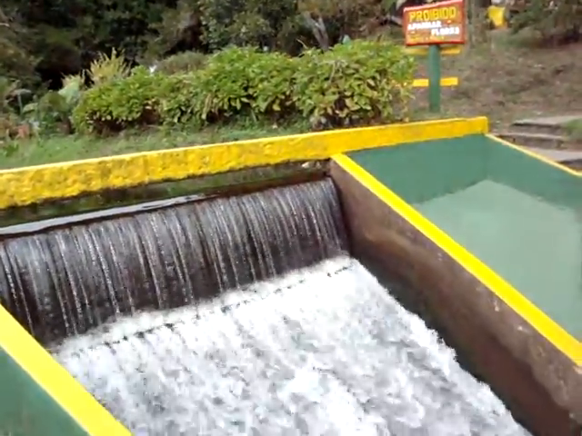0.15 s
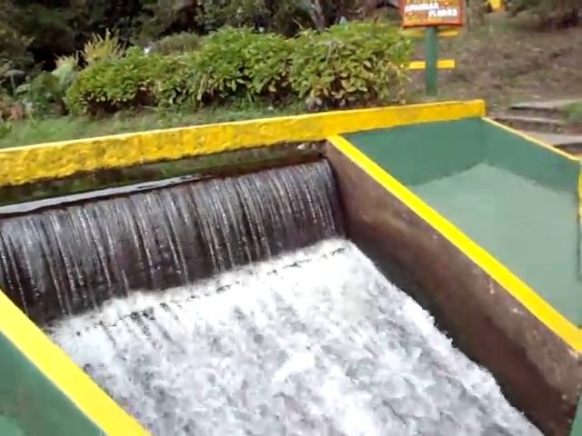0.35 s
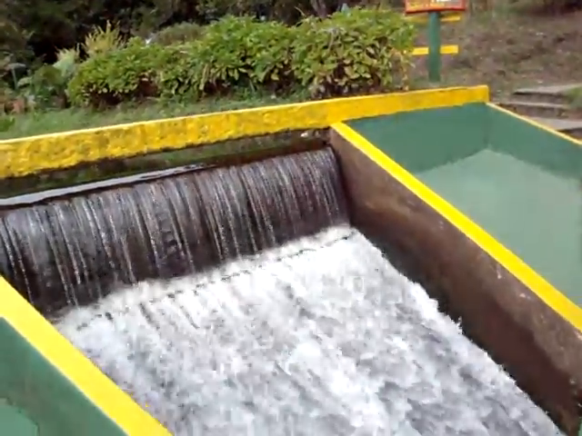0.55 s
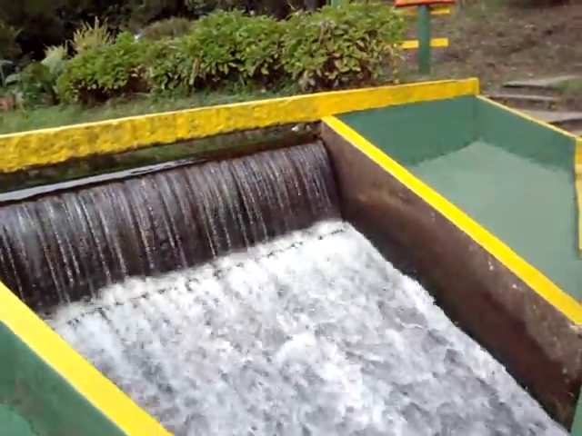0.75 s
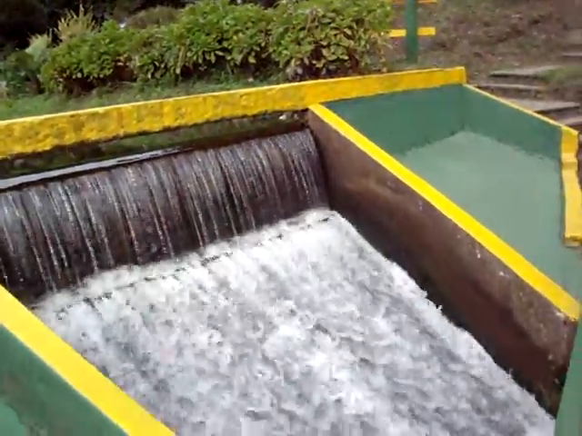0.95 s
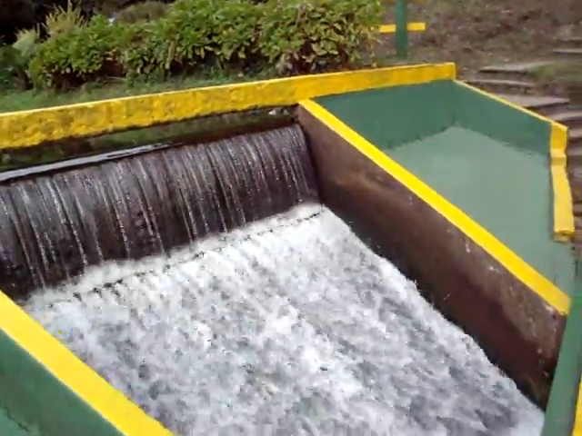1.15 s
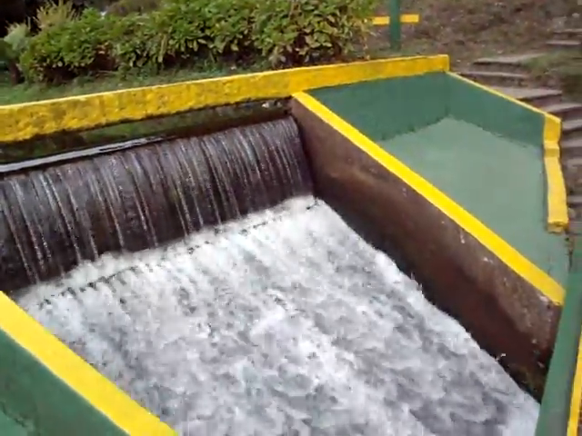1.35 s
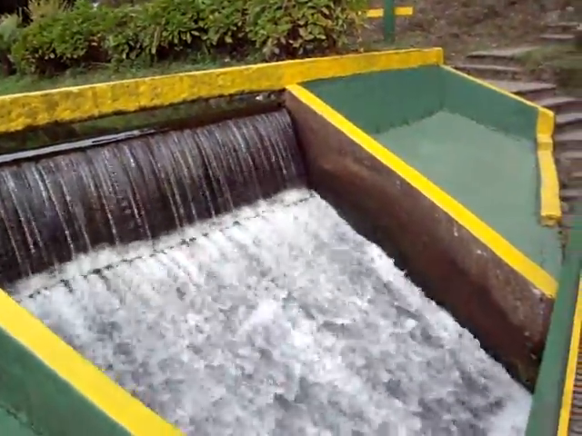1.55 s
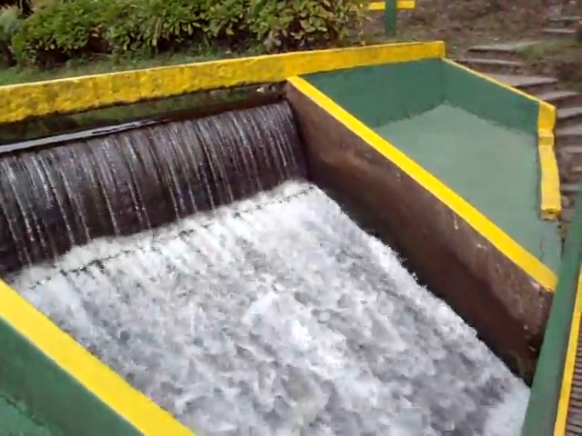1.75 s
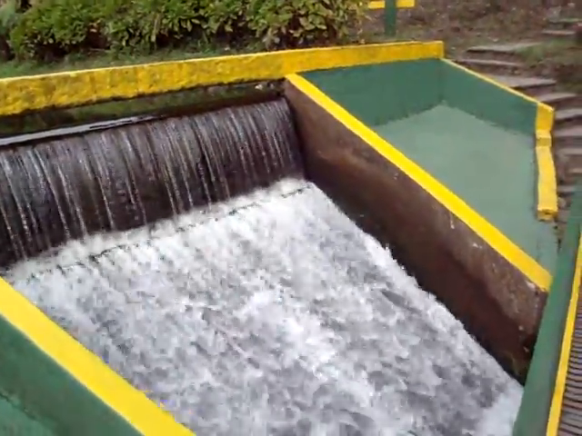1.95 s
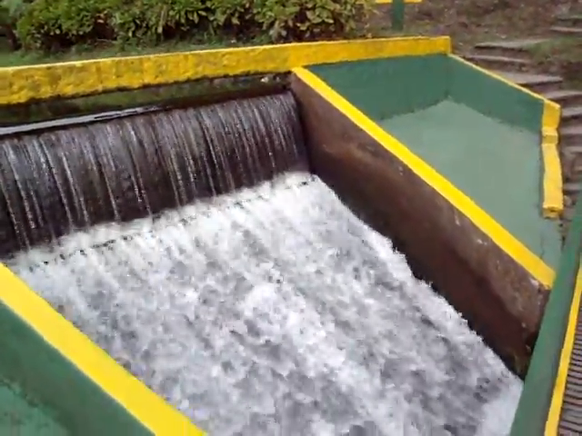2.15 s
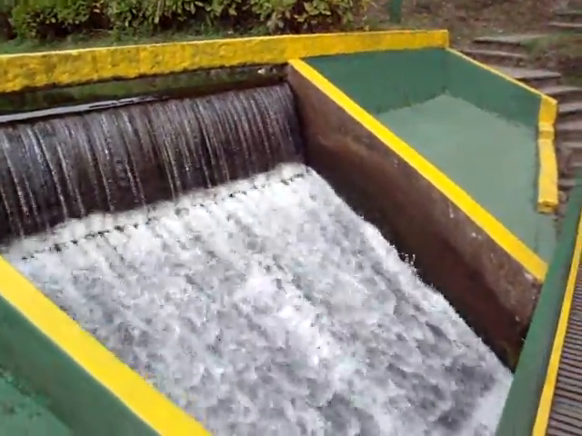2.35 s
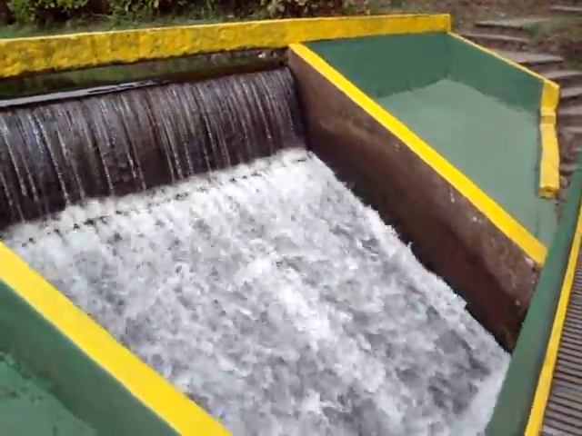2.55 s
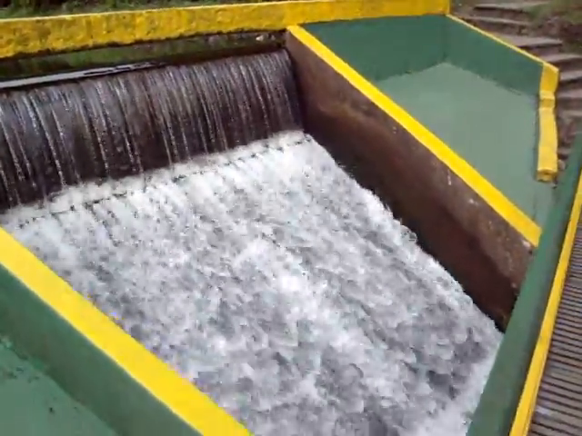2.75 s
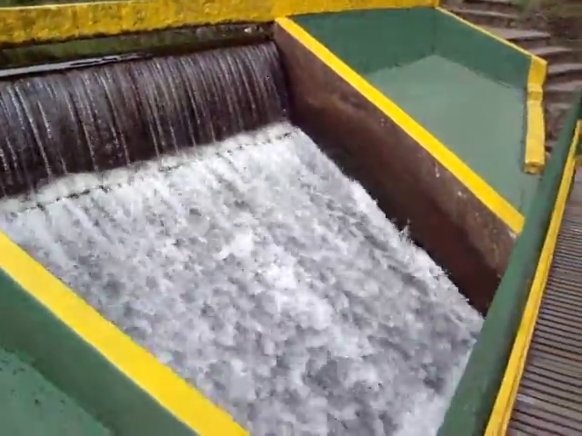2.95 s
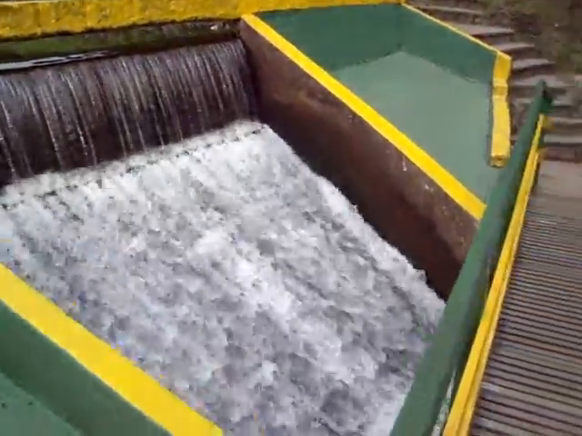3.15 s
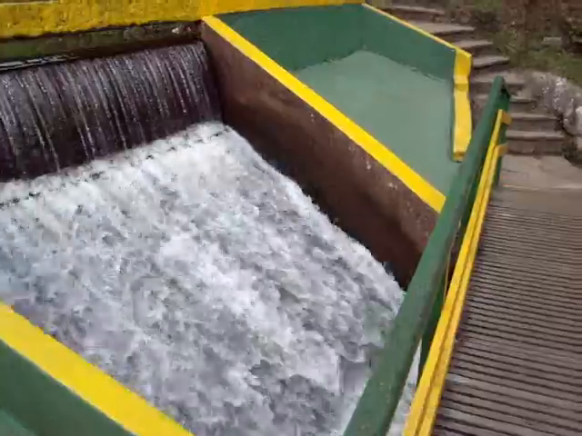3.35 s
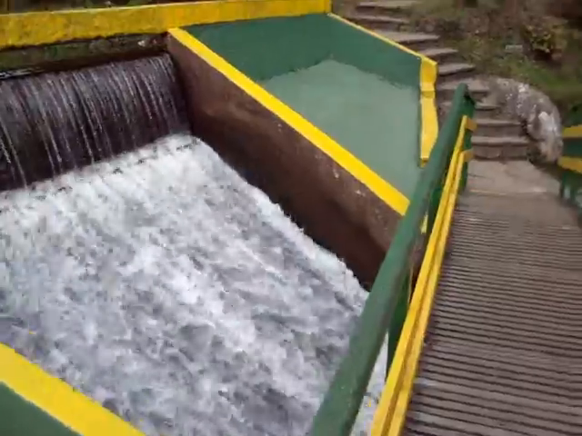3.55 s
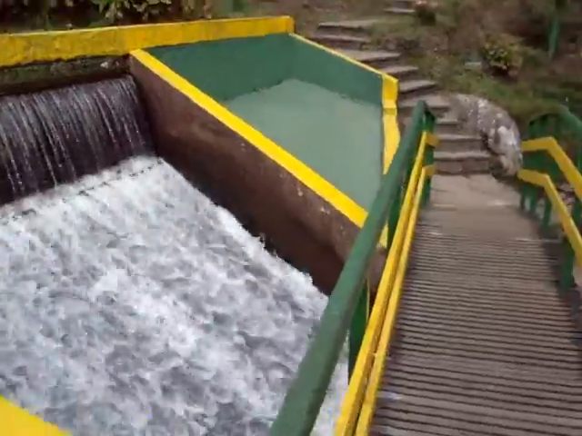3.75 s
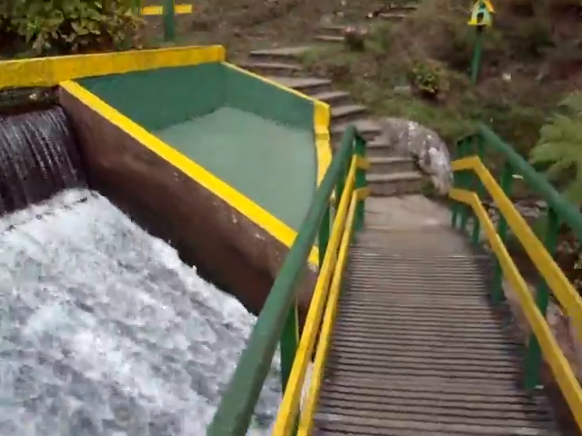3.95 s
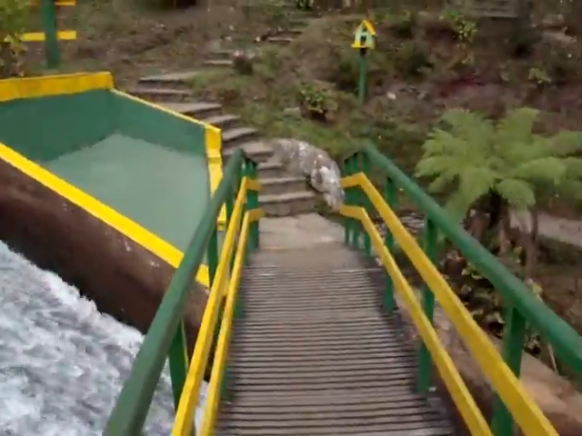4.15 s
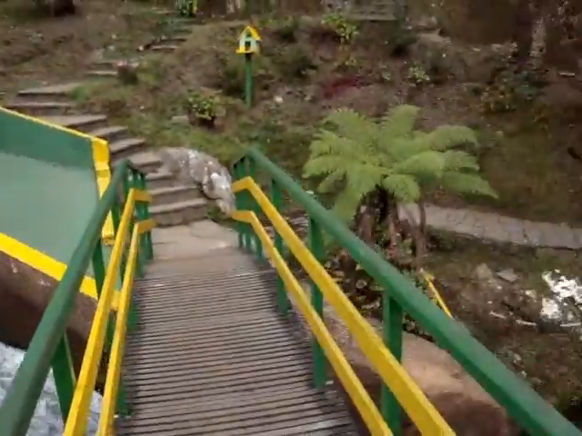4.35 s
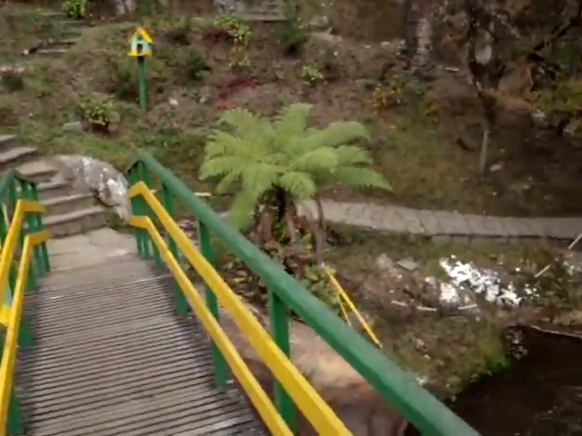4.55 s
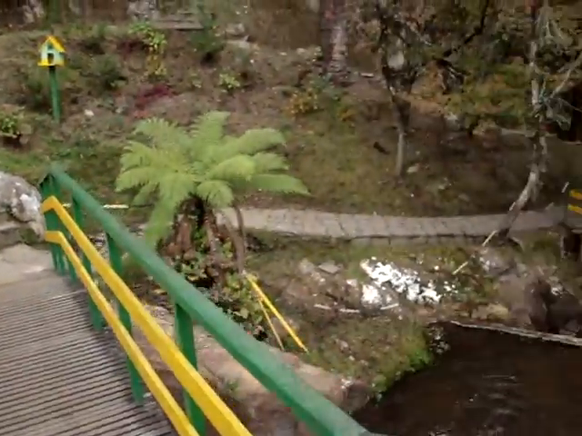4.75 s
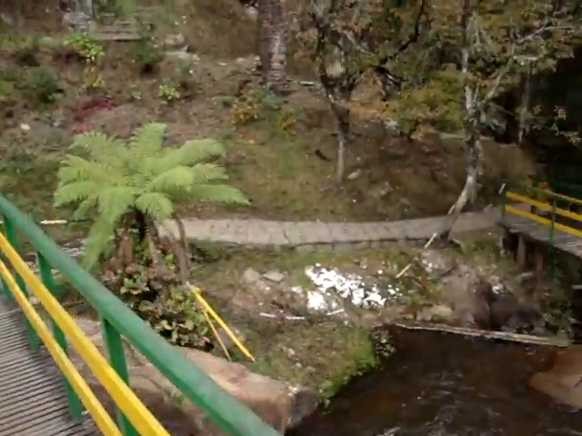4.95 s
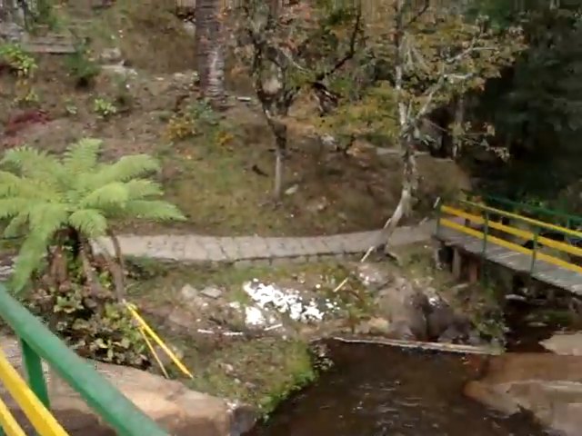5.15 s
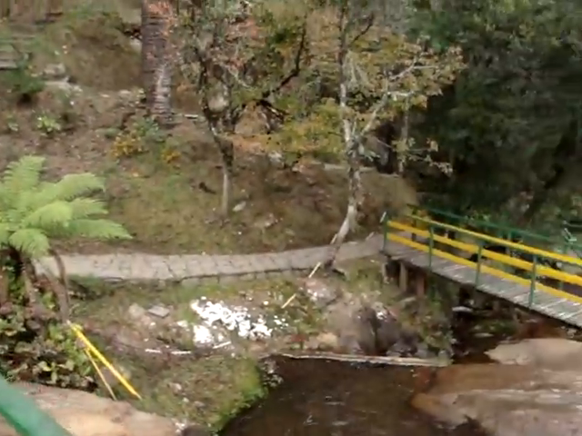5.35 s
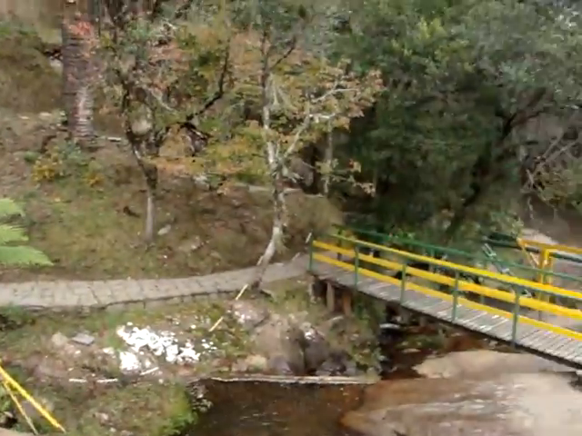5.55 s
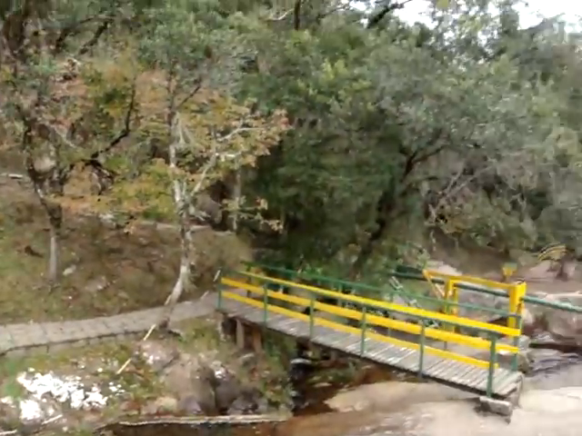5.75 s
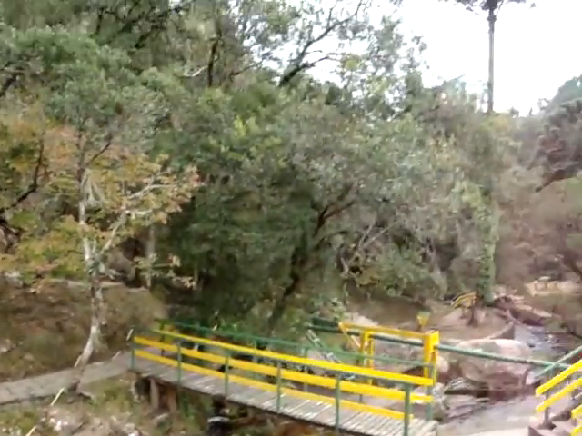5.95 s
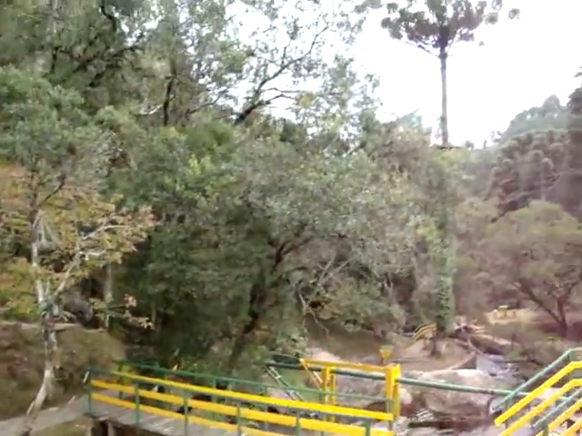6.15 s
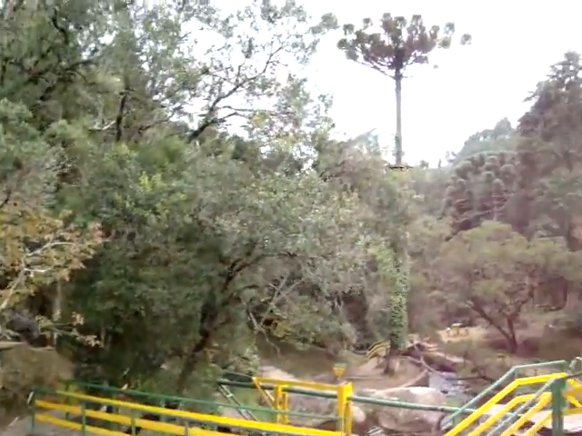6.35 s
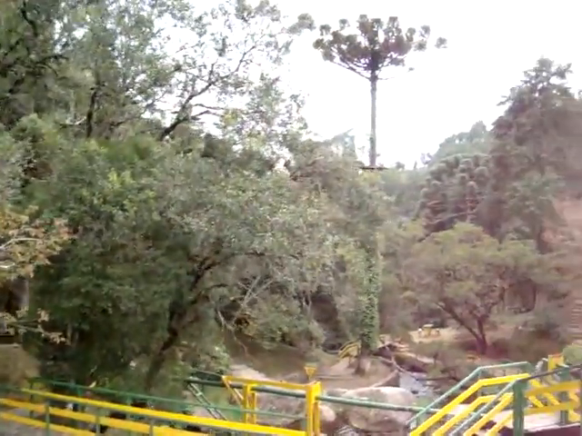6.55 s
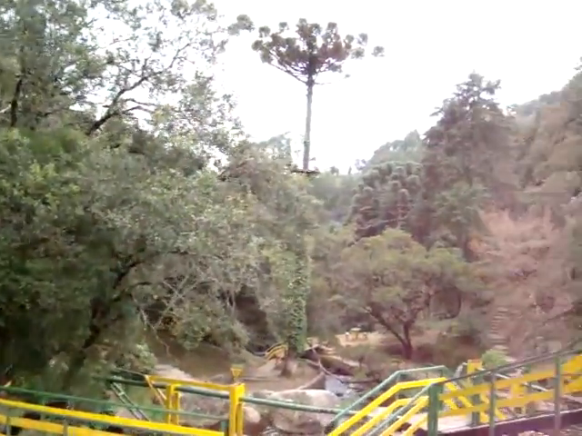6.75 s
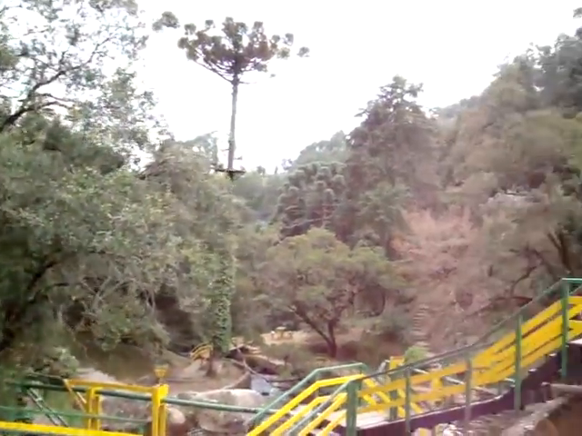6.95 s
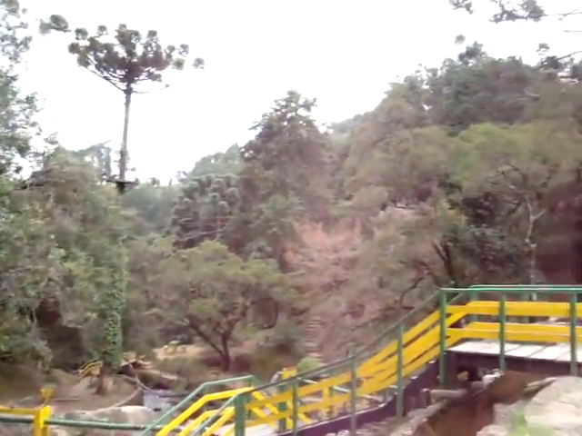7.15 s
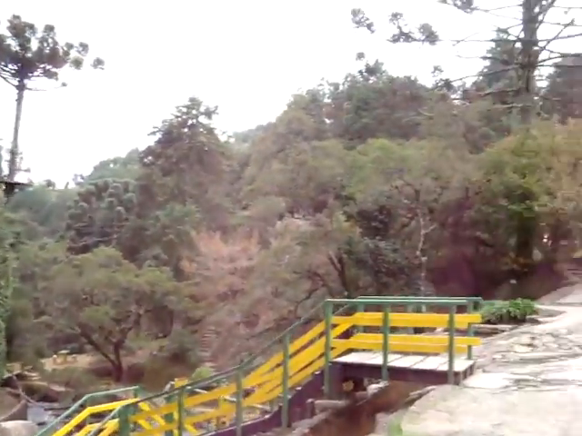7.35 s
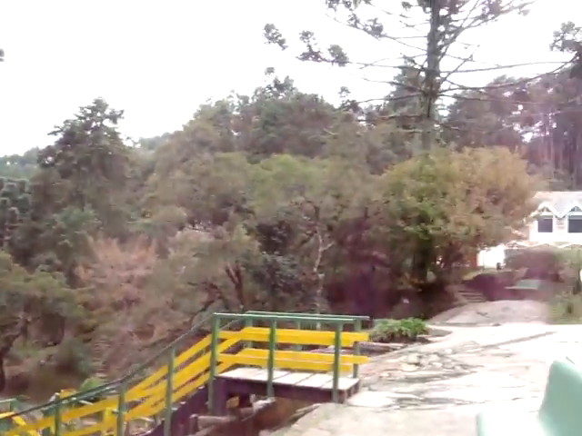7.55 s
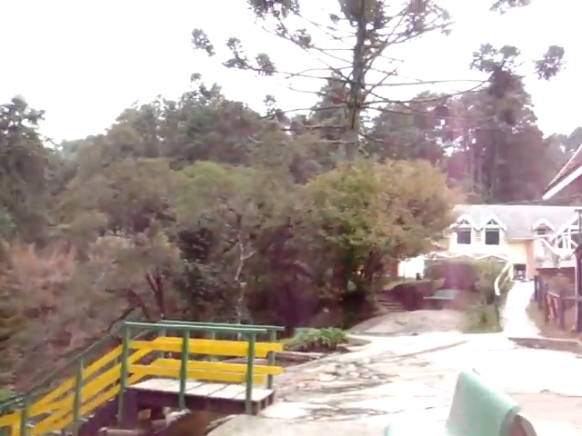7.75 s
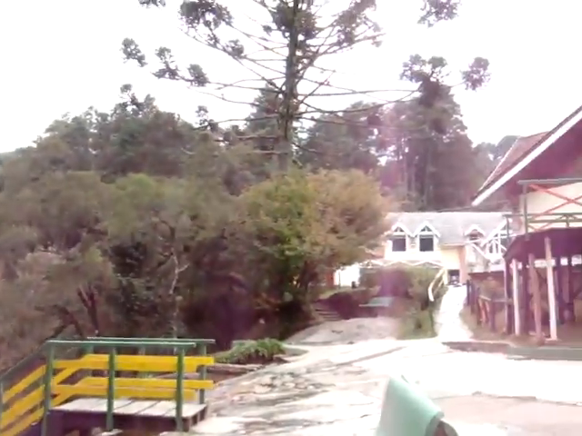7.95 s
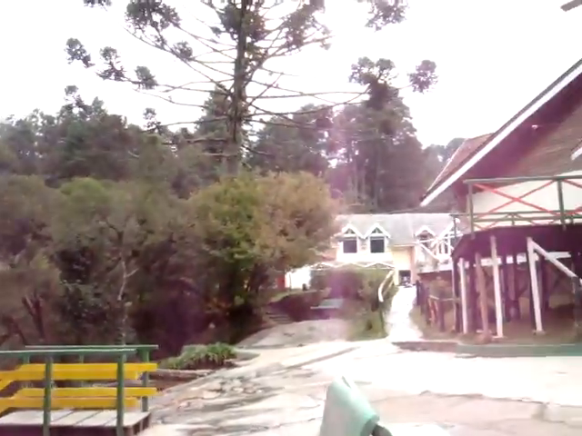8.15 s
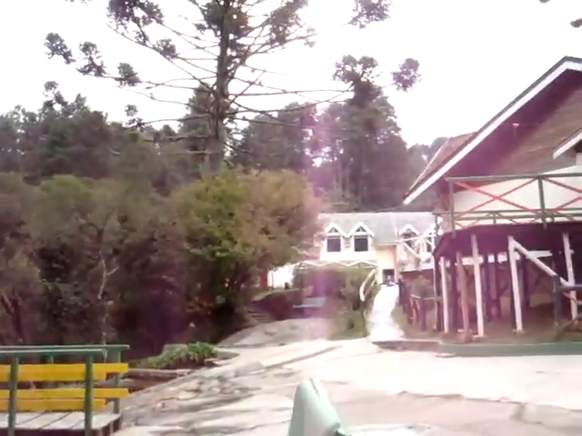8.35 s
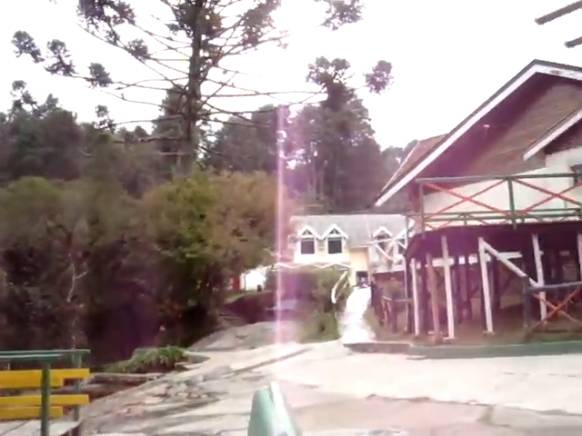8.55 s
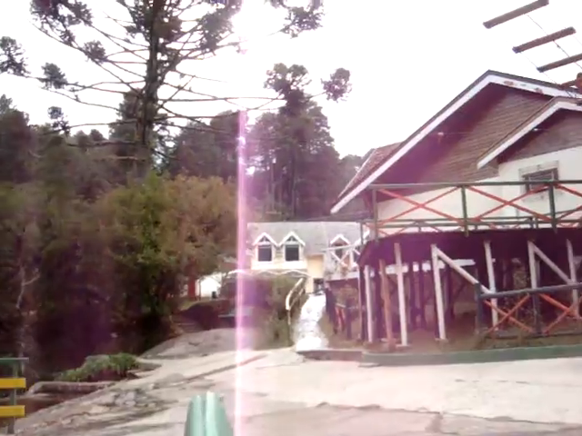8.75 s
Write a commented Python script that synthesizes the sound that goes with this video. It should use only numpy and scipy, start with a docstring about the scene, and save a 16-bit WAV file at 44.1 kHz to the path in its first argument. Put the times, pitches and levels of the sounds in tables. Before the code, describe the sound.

A continuous waterfall rush starts at once, close and full, its spray swelling very slightly around three seconds. As the listener pans away from the channel, hollow watery colours drift through and the sound smoothly darkens and drops. Two quick low gulps come just before eight seconds. Single outdoor microphone, same sound on both sides, no clear echo.

```python
"""At a low concrete weir water pours over: the sheet plunges, bubbles churn in a walled channel, spray hisses.
The fall is noise in brief patches plus ringing bubbles, split into three bands: plunge, churn and spray.
The listener crosses a footbridge through the channel's standing waves, which are narrow bands of noise,
then turns away: the spray is shadowed most and a duller, more distant rush remains, with two hollow gulps.
One microphone feeds both channels."""
import sys
import numpy as np
from scipy import signal
from scipy.fft import rfft, irfft, next_fast_len
from scipy.io import wavfile
from scipy.ndimage import uniform_filter1d, map_coordinates

SR = 44100
rng = np.random.default_rng(int(sys.argv[2]) if len(sys.argv) > 2 else 0)


def store_wav(level_fs):
    """Save 16-bit WAV to argv[1]."""
    pcm = np.round(np.clip(np.atleast_2d(level_fs), -1, 1) * 32767)
    wavfile.write(sys.argv[1], SR, pcm.T.astype(np.int16))


N = 388080  # length in samples
TIME_S = np.arange(N) / SR


def amp(db):
    """Level as a logarithm: decibels to amplitude ratio."""
    return 10 ** (np.asarray(db) / 20)


def unit(x):
    """Normalisation to unit mean power: x at rms 1."""
    return x / np.sqrt(np.mean(x ** 2) + 1e-20)


def along(points, hz):
    """Spectral envelope: (f/Hz, level/dB) points joined on a logarithmic frequency axis."""
    f, level_db = np.transpose(points)
    return np.interp(np.log(hz + 1), np.log(f + 1), level_db)


def filtered(x, response):
    """Linear filtering: the spectrum of x multiplied by a real response of frequency."""
    size = next_fast_len(N + SR // 2)
    spectrum = rfft(x, size) * response(np.fft.rfftfreq(size, 1 / SR))
    return irfft(spectrum, size)[..., :N]


def below(hz, edge_hz, order=12):
    """Steep low-pass response, falling to one half at the edge."""
    return 1 / (1 + (hz / edge_hz) ** order)


def wobble(rate):
    """Slow random modulation: a smooth curve through random knots, rate of them a second."""
    knots = rng.standard_normal(int(N * rate / SR) + 4)
    return map_coordinates(knots, [TIME_S * rate])


def weir():
    """Broadband flow noise: the sheet plunges, trapped air churns, and drops burst into spray."""
    low_hz, high_hz = 550, 2000  # band edges
    water = foam(patchy_db=0.52)
    water = water + amp(-20) * bubbles(249, 2204, cycles=9.8, spread_db=1.5, rise=0.14, count=3500, size=900)
    water = water + amp(-10.5) * bubbles(2000, 9500, cycles=11.3, spread_db=1.5, rise=0.15, count=18000, size=180)

    # a higher lag shadows a part later in the turn
    plunge_db = shadowed(faced_db=-36.5, loss_db=5.5, lag=1.8)
    churn_db = shadowed(faced_db=-28.5, loss_db=9.8, lag=1.72)
    spray_db = shadowed(faced_db=-28.0, loss_db=14.6, lag=1.2)
    spray_db = spray_db + passing(nearest_s=2.9, half_s=0.53, gain_db=0.72)
    spray_db = spray_db + 0.32 * wobble(16)  # small uneven bursts

    plunge = amp(plunge_db) * heard(water, lambda hz: below(hz, low_hz))
    churn = amp(churn_db) * heard(water, lambda hz: below(hz, high_hz) - below(hz, low_hz))
    spray = amp(spray_db) * heard(water, lambda hz: 1 - below(hz, high_hz))
    return plunge + churn + spray


def foam(patchy_db):
    """Superposition of countless splashes: white noise with brief time-frequency patches of random gain."""
    grid = signal.stft(rng.standard_normal(N), nperseg=512)[2]
    field = rng.standard_normal(grid.shape)
    field = uniform_filter1d(field, size=8, axis=0)  # across frequency
    field = uniform_filter1d(field, size=12, axis=1)  # across time
    patchy = grid * amp(patchy_db * unit(field))
    return unit(signal.istft(patchy, nperseg=512)[1][:N])


def bubbles(low_hz, high_hz, cycles, spread_db, rise, count, size):
    """Damped bubble resonance: each rings briefly, rising in pitch as it nears the surface."""
    when, pitch, strength, phase = rng.random((count, 4)).T[:, :, None]
    hz = low_hz + (high_hz - low_hz) * pitch
    turns = hz * np.arange(size) / SR
    age = turns / cycles  # the ring falls 20 dB per unit of age
    tone = np.sin(2 * np.pi * turns * (1 + rise * np.minimum(age, 2) / 2))
    onset = 1 - np.exp(-2 * turns)
    ring = tone * amp(-20 * age) * onset
    # small bubbles are brief, so they need more height to carry the same energy
    height = np.sqrt(hz) * amp(-spread_db * np.log(np.maximum(strength, .01)))
    height = np.sign(phase - .5) * height  # either polarity
    at = (when * N).astype(int) + np.arange(size)
    return unit(np.bincount(at.ravel(), (height * ring).ravel(), N)[:N])


def heard(source, band):
    """Directional colouring: one band crossfades from the frontal spectrum to the rear one."""
    # spectral envelope facing the weir: f/Hz, relative density level/dB
    facing = [(30, -37), (70, -33), (125, -18.5), (260, -6), (400, -2.5), (580, -1.05), (770, -1.5),
              (950, 0.5), (1300, -4.5), (2000, -5.5), (3200, -6), (6200, -10.5), (8300, -15), (10000, -19)]
    # spectral envelope turned away: f/Hz, relative density level/dB
    behind = [(30, -31), (70, -25), (125, -16.5), (190, -8), (330, 0), (560, -0.5), (850, -1), (1450, -2),
              (2000, -8.5), (2900, -12.5), (4400, -16.5), (6200, -21), (10000, -28.5)]
    turn = turned(lag=1.2)
    front = unit(filtered(source, lambda hz: amp(along(facing, hz)) * band(hz)))
    back = unit(filtered(source, lambda hz: amp(along(behind, hz)) * band(hz)))
    return (1 - turn) * front + turn * back


def turned(lag):
    """Rotation of the listener in one smooth sweep: 0 facing the weir, 1 facing away."""
    start_s, length_s = 3.55, 5.76
    progress = np.clip((TIME_S - start_s) / length_s, 0, 1)
    return (np.sin(np.pi / 2 * progress) ** 2) ** lag


def shadowed(faced_db, loss_db, lag):
    """Acoustic shadowing: the level in dB falls by loss_db as the listener turns away."""
    return faced_db - loss_db * turned(lag)


def bell(centre_s, half_s):
    """Gaussian envelope: 1 at the centre, exp(-1/2) at half_s to either side."""
    return np.exp(-.5 * ((TIME_S - centre_s) / half_s) ** 2)


def passing(nearest_s, half_s, gain_db):
    """Level rises with proximity: the swell in dB as the listener walks past the spray."""
    return gain_db * bell(nearest_s, half_s)


def standing_waves():
    """Standing waves between the channel walls: each is loudest at one spot of the walk."""
    # resonances: t/s, half length/s, f/Hz, width/Hz, rms level at the peak before the common gain/dB
    standing = [(.1, 0.36, 495, 45, -40.5), (.7, 0.82, 1100, 160, -41.5), (3.3, 1, 955, 110, -38.5),
                (4.4, 0.38, 673, 55, -35), (5.3, 0.97, 419, 50.3, -38), (5.9, .6, 192, 40, -51),
                (6.3, .7, 1380, 200, -43.5)]
    return amp(-3.0) * hollows(standing)


def gulps():
    """Air resonance: brief hollow gulps of the stream."""
    # gulps: t/s, half length/s, f/Hz, width/Hz, rms level at the peak/dB
    gulp_rows = [(7.65, 0.048, 370, 60, -38.5), (7.92, 0.015, 366, 60, -38)]
    return hollows(gulp_rows)


def hollows(rows):
    """Resonance driven by turbulence: narrow noise bands that swell and fade."""
    out = np.zeros(N)
    for centre_s, half_s, centre_hz, width_hz, db in rows:
        noise = rng.standard_normal(N)
        ring = unit(filtered(noise, lambda hz: 1 / (1 + ((hz - centre_hz) / width_hz * 2) ** 2)))
        out += amp(db) * bell(centre_s, half_s) * ring
    return out


def scene():
    """Superposition: the fall, its channel and the stream add at one microphone, alike in both channels."""
    mono = weir() + standing_waves() + gulps()
    return np.array([mono, mono])


def record(dry):
    """Band limitation: an ideal low-pass keeps nothing at or above its edge."""
    top_hz = 10130
    return filtered(dry, lambda hz: hz < top_hz)


dry = scene()
out = record(dry)
store_wav(out)
```